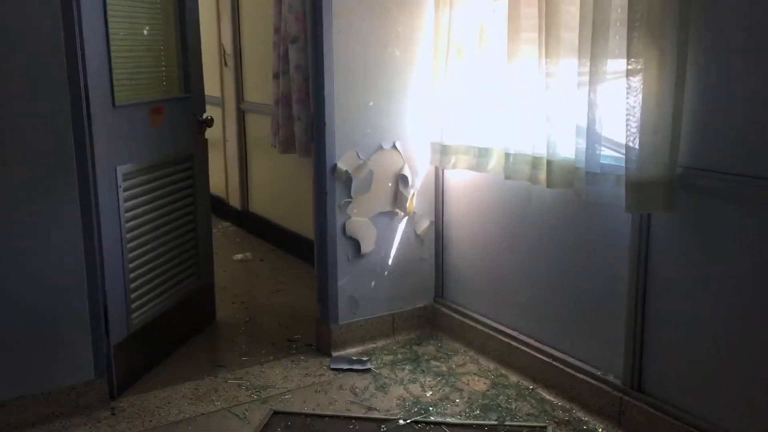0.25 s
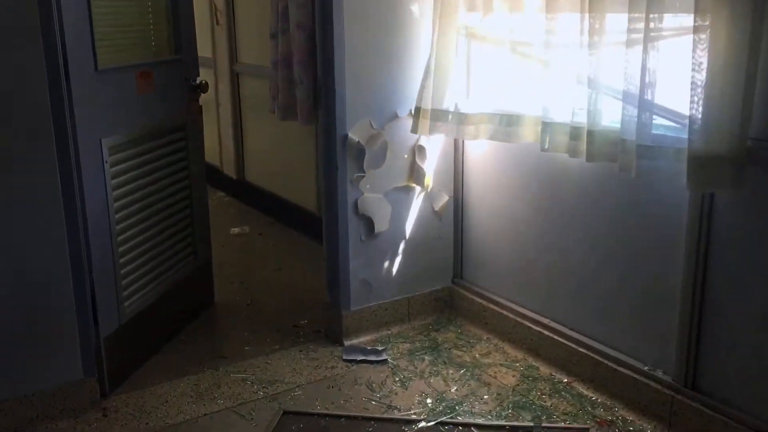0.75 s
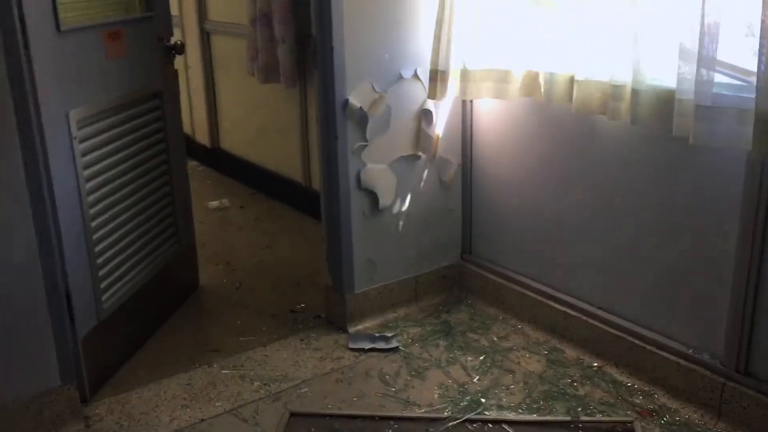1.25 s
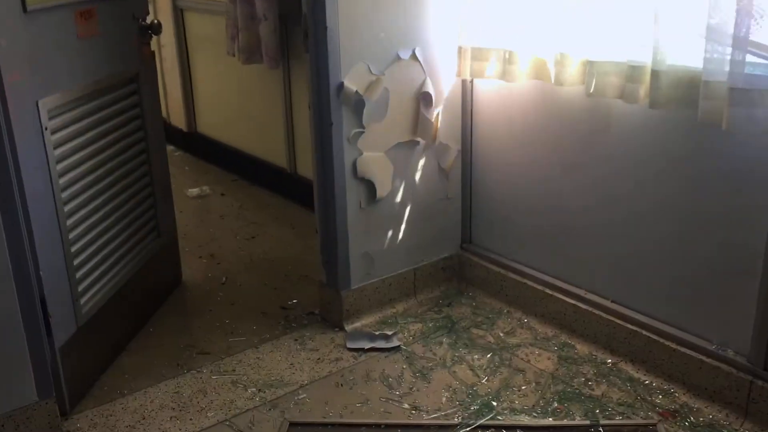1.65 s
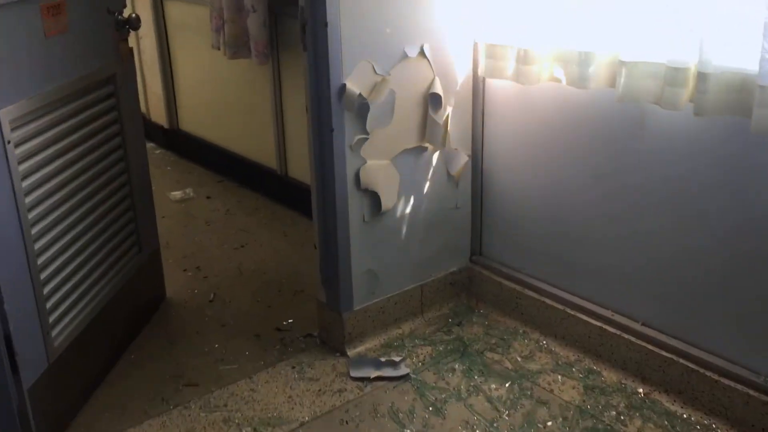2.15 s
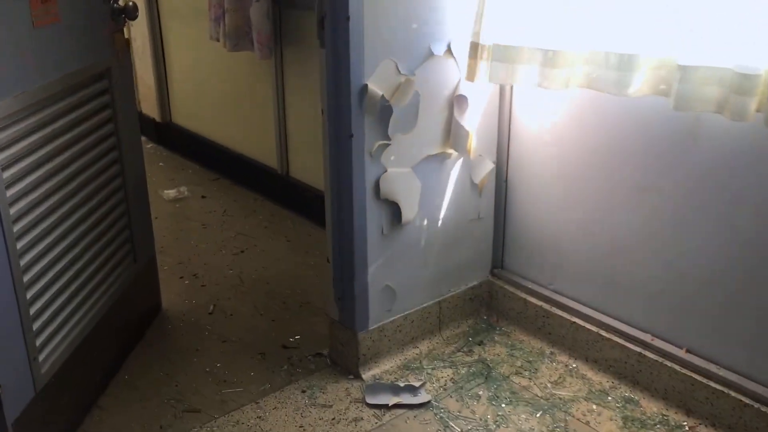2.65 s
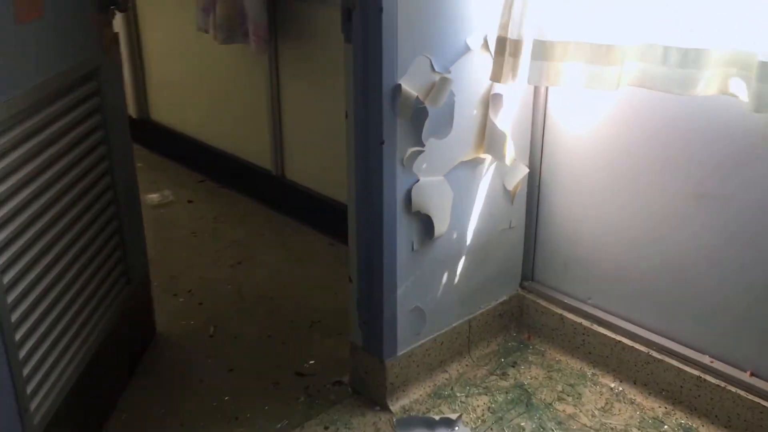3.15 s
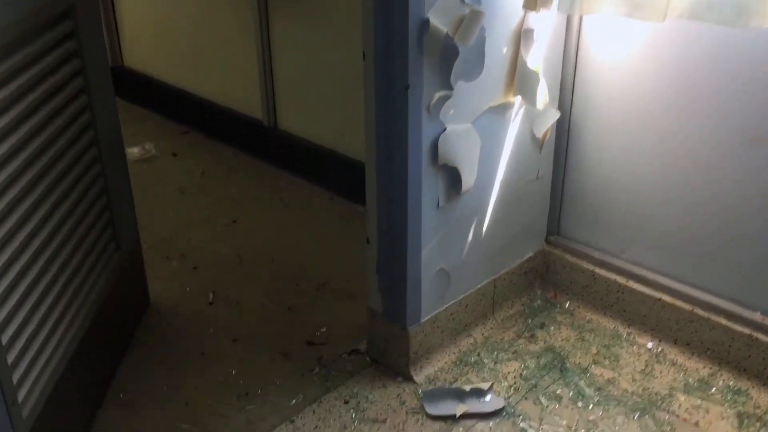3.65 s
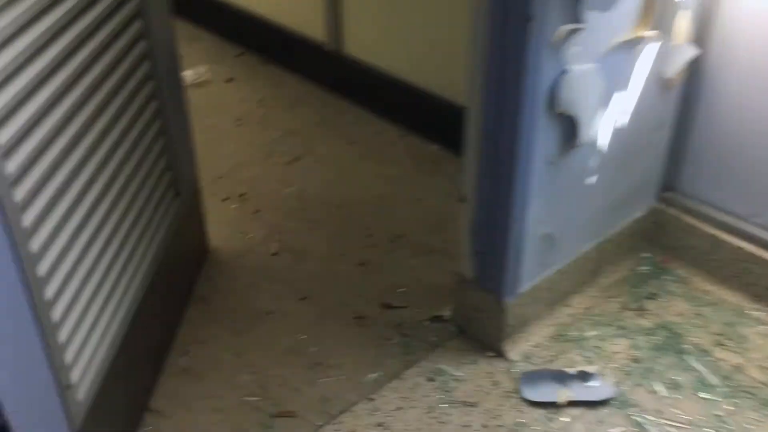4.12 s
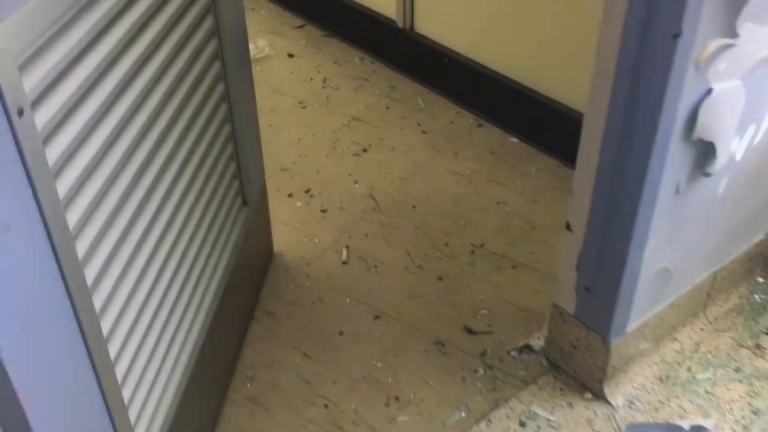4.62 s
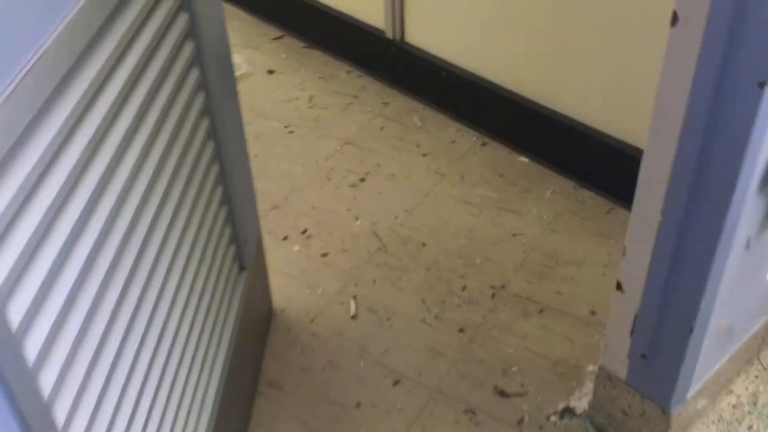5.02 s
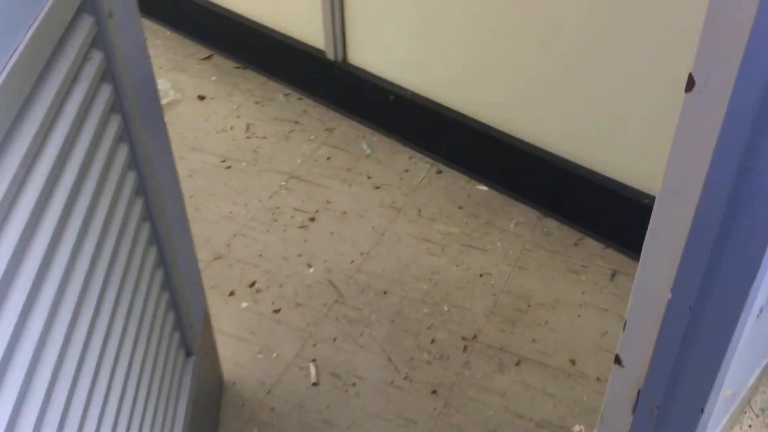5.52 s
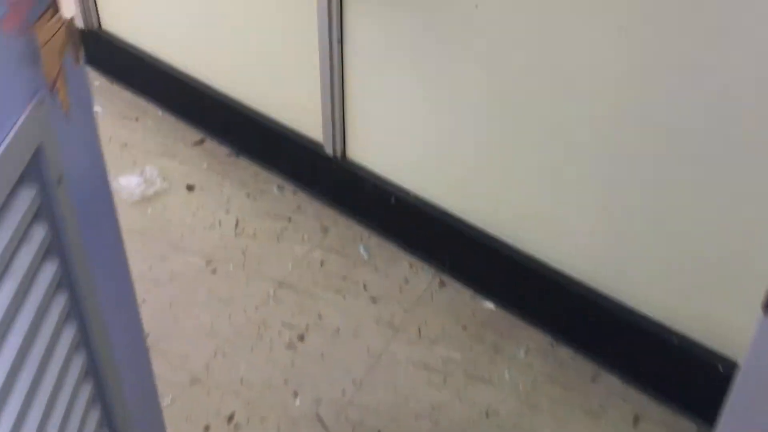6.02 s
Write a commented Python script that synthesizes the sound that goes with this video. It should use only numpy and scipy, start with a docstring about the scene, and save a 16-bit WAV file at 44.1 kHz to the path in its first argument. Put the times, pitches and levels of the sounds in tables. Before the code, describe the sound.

Inside an empty, bare-walled building, quiet air and a faint low drone lie behind slow steps on broken glass, heard close up. A soft crumbling crunch opens the scene, with light crackles and scuffing until 0.8 s. Sharp snaps at about 0.87 s lead into the heaviest crunch, from 0.95 to 1.3 s, weighty and dense, ringing off floor and walls. Smaller cracks follow to 1.5 s, then gritty scraping and ticks around 2 s, and a softer crunch at 2.4 s. Light snaps and scuffs continue from 2.7 to 3.6 s; the drone rises slightly near 3.65 s. A piercing, bright snap bursts at 3.84 s, echoing, with a scuff after. Lesser cracks and crunches come at 4.55, 4.9 and 5.0 s, then a firmer crunch at 5.5 s. A faint scrape follows, and at 6.05 s a shard skips with a very high, brief ping, touching again at 6.1 s.

```python
"""Slow steps over broken glass

In an empty, hard-walled building, shards crumble under a sole: swarms of tiny random clicks, coloured,
echoed by noise tails and ringing in narrow resonances. Close by, pieces snap (resonated impulses plus noise
splinters), a shoe scuffs through grit (noise with ticks) and one shard skips away with a high ping (decaying
sines). Behind them lie quiet air (coloured noise) and a low drone (resonated noise) that grows once."""
import sys
import numpy as np
from scipy import signal
from scipy.fft import rfft, irfft
from scipy.io import wavfile

SR = 44100
rng = np.random.default_rng(int(sys.argv[2]) if len(sys.argv) > 2 else 0)


def unload_wav(signal):
    """Save mono or channel-first audio to the path in sys.argv[1] as 16-bit WAV at rate SR, clipped to [-1, 1]."""
    wavfile.write(
        sys.argv[1],
        SR,
        np.round(np.clip(np.atleast_2d(signal).T, -1, 1) * 32767).astype(np.int16),
    )


N = 276507
TIME = np.arange(N) / SR


def undb(db):
    """Decibels to amplitude gain."""
    return 10 ** (np.asarray(db) / 20)


def unit(x):
    """Scale to an energy of one."""
    return x / np.sqrt(np.sum(x ** 2))


def add(track, start_s, x):
    """Mix a sound into a track, cut at the track's end."""
    i = max(int(start_s * SR), 0)
    track[i:i + len(x)] += x[:N - i]


def colour(x, points):
    """Minimum-phase filter of unit energy, shaped through (Hz, relative dB) points."""
    size = 2048
    hz, db = np.transpose(points)
    f = np.maximum(np.fft.rfftfreq(size, 1 / SR), 1)
    gain = undb(np.interp(np.log(f), np.log(hz), db))
    # folding the cepstrum makes the filter causal
    cepstrum = irfft(np.log(gain))
    cepstrum[1:size // 2] *= 2
    cepstrum[size // 2 + 1:] = 0
    impulse_response = unit(irfft(np.exp(rfft(cepstrum))))
    return signal.oaconvolve(x, impulse_response)[:len(x)]


def resonate(x, hz, width_hz):
    """One resonance, gain 1 at its centre."""
    hz = min(hz, SR * .45)
    b, a = signal.iirpeak(hz, hz / min(width_hz, SR / 4), fs=SR)
    return signal.lfilter(b, a, x)


def grains(count, spread_db):
    """Dense tiny clicks, a few far larger than the rest."""
    size = np.minimum(rng.exponential(size=count), 2 * np.pi)
    return rng.standard_normal(count) * undb(spread_db * size)


def walk(knots_per_s):
    """Slow random curve with a spread near one, linear between random knots."""
    knots = rng.standard_normal(1024)
    return np.interp(TIME * knots_per_s, np.arange(len(knots)), knots)


def room(x, t60_low_s, t60_high_s, gap_s, late_db, late_t60_s):
    """Dense wall echoes after a gap; the treble dies first, a faint long tail comes from further rooms."""
    t = TIME[:SR * 3 // 4]
    noise = rng.standard_normal(len(t))
    low = signal.sosfilt(signal.butter(1, 5000, fs=SR, output="sos"), noise)
    high = noise - low
    low_decay = undb(-60 * t / t60_low_s) + undb(late_db - 60 * t / late_t60_s)
    tail = low * low_decay + high * undb(-60 * t / t60_high_s)
    return signal.fftconvolve(x, unit(tail * (t > gap_s)))[:N]


# Spectrum of the quiet air. Each row: frequency in Hz, relative density in dB.
AIR_SPECTRUM = [(15, -14), (25, 1.5), (64, 7.5), (190, -3), (354, -4.5), (451, -14), (1740, -30),
                (3720, -18.5), (4870, -33), (5430, -18.5), (9070, -29.5), (14800, -33.5), (16000, -31)]
AIR_DB = -60.5
# the drone grows as the walker nears the doorway
DRONE_FAR_DB, DRONE_NEAR_DB, DOORWAY_S, APPROACH_S = -65.5, -60, 3.65, 0.1


def building():
    """Air is coloured noise; the corridor's wavering drone is noise through low, broad resonances."""
    air = colour(rng.standard_normal(N), AIR_SPECTRUM) * undb(AIR_DB + 0.15 * walk(knots_per_s=5.48))
    hum = resonate(rng.standard_normal(N), 182, 20)
    upper_hum = resonate(rng.standard_normal(N), 255, 92)
    drone = resonate(hum + undb(-9.5) * upper_hum, 202, 230)
    nearness = (1 + np.tanh((TIME - DOORWAY_S) / APPROACH_S)) / 2
    drone_db = DRONE_FAR_DB + (DRONE_NEAR_DB - DRONE_FAR_DB) * nearness
    return air + drone / drone.std() * undb(drone_db)


# Slides of a sole through grit. Each row: hardest push in seconds, relative level in dB,
# nominal length in seconds.
SCUFFS = [ (0.337, -57, 0.31), (0.91, -48, .08), (1.12, -50, 0.35), (2.105, -52.5, 0.19), (2.96, -52, 0.26),
          (3.528, -55.5, 0.29), (3.943, -52.5, 0.23), (4.54, -60, 0.33), (5.75, -58.5, 0.17)]
# Spectrum of the rubbing. Each row: frequency in Hz, relative density in dB.
GRIT_SPECTRUM = [(100, -3), (400, 0), (900, 1), (1600, -2), (3000, -9), (5000, -16.5), (9000, -20),
                 (16000, -32.5)]
SCUFF_RISE_SHARE = 0.54  # share of the length that sets the swell; the rest sets the fade
SHUFFLE_DB = -64.5  # the feet are never quite still
CRUMBS_PER_S, CRUMB_DB = 35, -13  # level relative to the rub


def scuff():
    """A sole drags unevenly through dust, swelling and fading; crumbs of grit tick under it."""
    power = undb(SHUFFLE_DB) ** 2
    for push_s, db, length_s in SCUFFS:
        width_s = length_s * np.where(TIME < push_s, SCUFF_RISE_SHARE, 1 - SCUFF_RISE_SHARE)
        power = power + undb(db) ** 2 * np.exp(-((TIME - push_s) / width_s) ** 2)
    pressure = np.sqrt(power) * undb(1.6 * walk(knots_per_s=57))
    rub = colour(grains(N, spread_db=2.5), GRIT_SPECTRUM)
    crumbs = rng.choice([-1, 1], N) * (rng.random(N) < CRUMBS_PER_S / SR)
    crumbs = resonate(resonate(crumbs, 2030, 2600), 2400, 4600)
    return pressure * (rub / rub.std() + undb(CRUMB_DB) * crumbs / crumbs.std())


# Landings of the skipping shard. Each row: start in seconds, relative level in dB.
SHARD_LANDINGS = [(6.0488, -26), (6.0549, -32), (6.1088, -32.5)]
# Modes of the shard. Each row: frequency in Hz, relative level in dB, 60 dB decay time in seconds.
SHARD_MODES = [(7251, 0, .13), (7300, -8, .05), (10000, -9, .11)]


def shard():
    """A loose shard's modes ring at each landing; the walls carry the ping on and make it waver."""
    track, t = np.zeros(N), TIME[:SR // 2]
    for start_s, db in SHARD_LANDINGS:
        for hz, mode_db, t60_s in SHARD_MODES:
            swing = np.sin(2 * np.pi * (hz * t + rng.random()))
            decay = np.exp(-np.log(1000) * t / t60_s)
            add(track, start_s, undb(db + mode_db) * swing * decay)
    walls = room(track, t60_low_s=.42, t60_high_s=.38, gap_s=.003, late_db=-32, late_t60_s=1.0)
    return track + undb(3) * walls


# Near snaps and knocks, and one bright ceiling echo of the loudest snap (the 14.5 kHz row).
# Each row: start in seconds, relative level in dB, pitch in Hz,
# splinter level relative to the crack in dB.
SNAPS = [ (0.843, -45, 1500, -7), (0.868, -37.5, 1180, -30), (0.8713, -30, 1130, -30),
         (1.3913, -38, 2460, -19), (1.4, -45, 9000, 1), (1.88, -53, 5900, 0), (1.951, -41.5, 2820, -10),
         (2.030, -50, 1040, 2), (2.0379, -44.5, 830, 6.5), (2.195, -48, 875, -25), (2.9176, -51, 4000, 7),
         (2.9314, -41.5, 2720, 3.5), (3.1552, -52, 2680, -7), (3.4735, -48, 3250, -12),
         (3.5654, -47, 1950, -22), (3.835, -23, 1660, -15), (3.8383, -20, 2600, -18),
         (3.843, -25.5, 2600, -9), (3.856, -38, 14500, -3), (3.860, -33.5, 2920, -7),
         (3.9398, -41, 2000, 1), (3.9434, -35.5, 3160, -4.5), (4.024, -49.5, 2520, 1.5),
         (4.388, -47.5, 2380, -5), (4.566, -40, 2510, -6), (5.001, -38, 2290, -10),
         (5.3821, -51, 1930, -26), (5.970, -61.5, 4000, 12), (6.0466, -31.5, 11900, -12.5),
         (6.1025, -35, 10900, -5.5)]
# median gap; level step to the first run-on crack; step per further crack; pitch scatter, either way
RUN_ON_GAP_S, RUN_ON_DB, RUN_ON_FADE_DB, RUN_ON_SCATTER_OCT = .005, -6.5, -7, .3


def fractures(count):
    """The crack runs on: yield each row of SNAPS, then count weaker copies at uneven gaps."""
    for start_s, db, hz, splinter_db in SNAPS:
        yield start_s, db, hz, splinter_db
        for k, (gap, size) in enumerate(rng.uniform(-1, 1, (count, 2))):
            start_s = start_s + RUN_ON_GAP_S * 2 ** gap
            run_on_db = db + RUN_ON_DB + k * RUN_ON_FADE_DB
            yield start_s, run_on_db, hz * 2 ** (RUN_ON_SCATTER_OCT * size), splinter_db


# Tone of the near snaps. Each row: frequency in Hz, relative gain in dB.
SNAP_TONE = [(100, 10.5), (280, 12), (1000, 4.5), (1650, -2.5), (2200, -1.5), (3000, 0), (4500, -4),
             (6200, -1), (9300, -1), (11000, -1), (13000, 4.5), (15500, 5.5)]


def snaps():
    """A piece breaks with a few pressure swings and a splinter spray; ceiling and walls answer."""
    track, t = np.zeros(N), TIME[:SR // 30]
    spray_tone = [(300, -8.0), (900, -11.0), (3000, 0), (9000, -1.0), (16000, -23.5)]
    for start_s, db, hz, splinter_db in fractures(count=2):
        crack = resonate(resonate(signal.unit_impulse(len(t)), hz, hz * 0.84), hz, hz)
        spray = colour(rng.standard_normal(len(t)) * np.exp(-t / 0.0023), spray_tone)
        add(track, start_s, undb(db + 24) * (unit(crack) + undb(splinter_db) * unit(spray)))
    track = colour(track, SNAP_TONE)
    # flat glass beams its highest treble upwards: the ceiling returns a bright, smeared echo
    smear = unit(rng.standard_normal(len(t)) * np.exp(-t / .006))
    ceiling_tone = [(300, -4), (3000, -16), (9000, -38), (12000, 11), (15500, -15), (18000, 10)]
    echo = colour(signal.oaconvolve(track, smear), ceiling_tone)
    ceiling = np.zeros(N)
    add(ceiling, .0175, undb(-9) * echo)
    walls = room(track + ceiling, t60_low_s=.5, t60_high_s=.42, gap_s=.003, late_db=-22, late_t60_s=1.3)
    return track + ceiling + undb(-6.0) * walls


# Loads of a sole on the glass along the corridor. Each row: start in seconds, relative level in dB,
# rise in seconds, decay constant in seconds, treble tilt in dB per octave,
# weight of the heel in the bass in dB.
CRUNCHES = [ (0.043, -37.5, 0.023, 0.043, .5, -8), (0.430, -46.5, 0.0072, 0.02, -0.5, 7),
            (0.584, -47.5, 0.00068, 0.0042, -0.5, -16), (0.684, -42, .005, 0.012, 2.5, -17),
            (0.961, -25, 0.0024, 0.011, -3, 3.5), (1.049, -25, 0.0026, 0.013, 0.5, 13),
            (1.084, -27, 0.0091, 0.085, 1, 5), (1.196, -34, 0.013, 0.069, -2, -4),
            (1.394, -45, 0.003, 0.0062, -1, 6), (1.487, -45.5, .0035, 0.0067, -1, -29),
            (1.511, -37, 0.0011, 0.02, -4, 3.5), (2.436, -36, 0.019, 0.051, 0.5, -2),
            (2.691, -48, 0.0018, 0.0027, 3, -19), (2.757, -55.5, 0.009, 0.032, 1.5, -19),
            (4.561, -45, 0.0043, .004, -5.5, 2), (4.796, -45.5, 0.0019, 0.0075, -3, 9.5),
            (4.911, -37, .001, 0.033, 0.5, 16), (5.4818, -33.5, 0.0025, 0.012, -2.5, 8),
            (5.505, -35.5, 0.017, 0.026, 1, -10)]
# Spectrum of crumbling glass. Each row: frequency in Hz, relative density in dB.
GLASS_SPECTRUM = [(40, -13), (100, -6), (200, -6), (320, -11), (520, -7.5), (780, -5.5), (1150, -5),
                  (1500, 2.5), (2400, -1.5), (4600, -3.5), (6200, 0.5), (7300, -7), (9500, -4.5),
                  (10400, -12.5), (16000, -18.5)]
# Ring of the littered floor. Each row: frequency in Hz, width in Hz, lift in dB.
FLOOR_RINGS = [(319, 14, 8), (694, 12, 5), (770, 20, 6), (867, 9, 14), (997, 12, 8), (1118, 10, 4),
               (1262, 10, 3), (1345, 7, 17), (1430, 16, 4), (1472, 11, 14), (1512, 9, 5), (1553, 9, 8),
               (1728, 13, 12), (1800, 9, 5), (1838, 10, 7), (1918, 13, 5), (2140, 8, 11), (2305, 18, 8),
               (2528, 16, 13), (2690, 22, 7), (2940, 34, 5), (3228, 20, 6), (3573, 10, 10), (3760, 18, 5),
               (4065, 13, 7), (4762, 9, 8), (6510, 16, 4), (6630, 18, 4)]
# lift at 1.4 kHz: the duller the crunch, the larger the plates and the more they clack
CLACK_DB, CLACK_DB_PER_TILT = 1, -0.5
GRAIN_SPREAD_DB, CRUNCH_DIRECT_DB = 4.3, -4


def crunches():
    """Each load sets off a swarm of fractures that rings the floor; most arrives by way of the walls."""
    track, t = np.zeros(N), TIME[:SR // 4]
    for start_s, db, rise_s, decay_s, tilt_db, weight_db in CRUNCHES:
        load = np.minimum(t / rise_s, 1) * np.exp(-np.maximum(t - rise_s, 0) / decay_s)
        swarm = grains(len(t), spread_db=GRAIN_SPREAD_DB) * load
        # the heel fills in the bass, large plates clack, fine splinters brighten the burst
        heel = [(50, 1.1), (110, weight_db), (380, 1.12 * weight_db), (850, 0.63 * weight_db)]
        plates = [(1400, CLACK_DB + CLACK_DB_PER_TILT * tilt_db)]
        splinters = [(2300, 3.4), (16000, tilt_db * np.log2(7))]
        shaped = colour(swarm, heel + plates + splinters)
        burst = undb(db + 29.5) * unit(colour(shaped, GLASS_SPECTRUM))
        add(track, start_s, undb(CRUNCH_DIRECT_DB) * burst)
        # every spot on the floor has its own pattern of echoes
        walls = room(burst, t60_low_s=0.45, t60_high_s=0.4, gap_s=0.00036, late_db=-20.5, late_t60_s=0.77)
        add(track, start_s, walls)
    for hz, width_hz, lift_db in FLOOR_RINGS:
        track = track + (undb(lift_db) - 1) * resonate(track, hz, width_hz)
    return track


def scene():
    """All sources at one microphone."""
    return (building() + scuff() + shard() + snaps() + crunches())[None]


def record(dry):
    """The recorder drops the deepest bass and cuts the top."""
    dry = signal.sosfilt(signal.butter(3, 36, "high", fs=SR, output="sos"), dry)
    return signal.sosfilt(signal.ellip(10, .2, 80, 15850, fs=SR, output="sos"), dry)


dry = scene()
out = record(dry)
unload_wav(out)
```